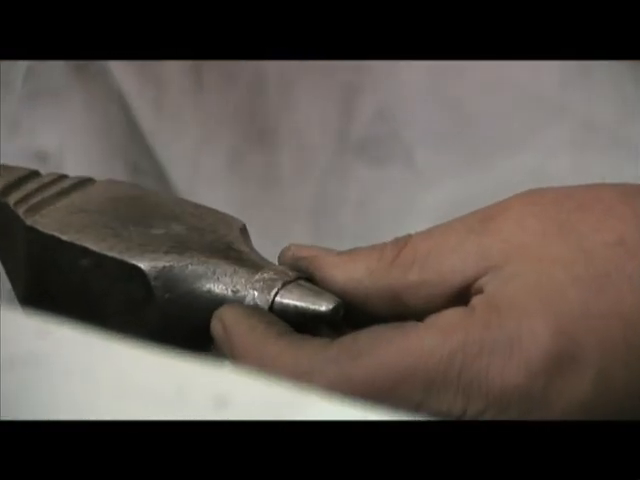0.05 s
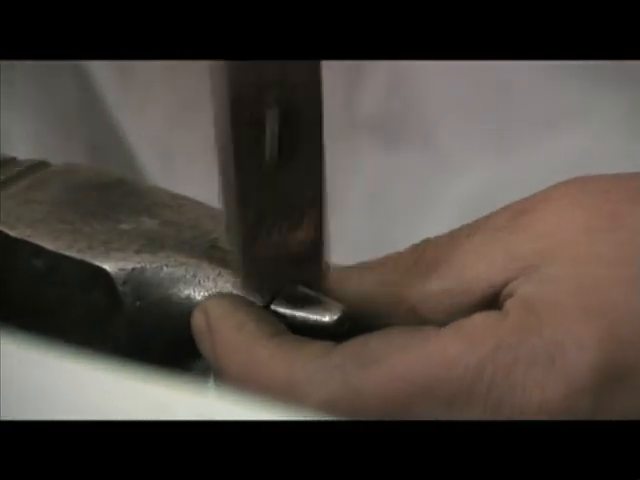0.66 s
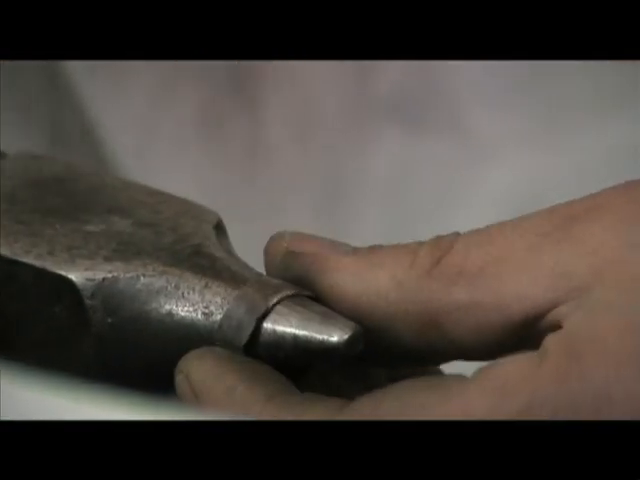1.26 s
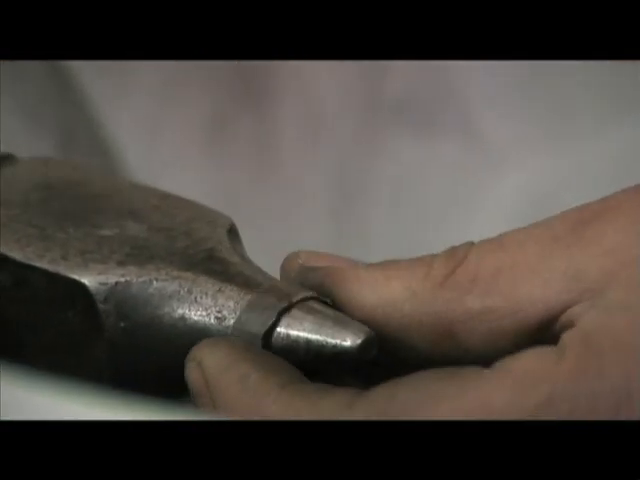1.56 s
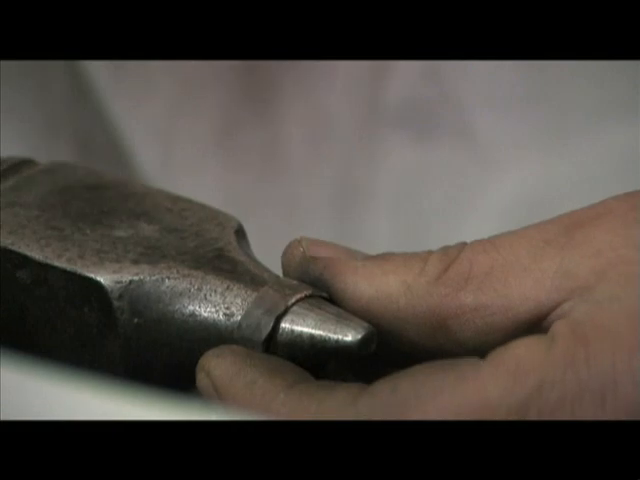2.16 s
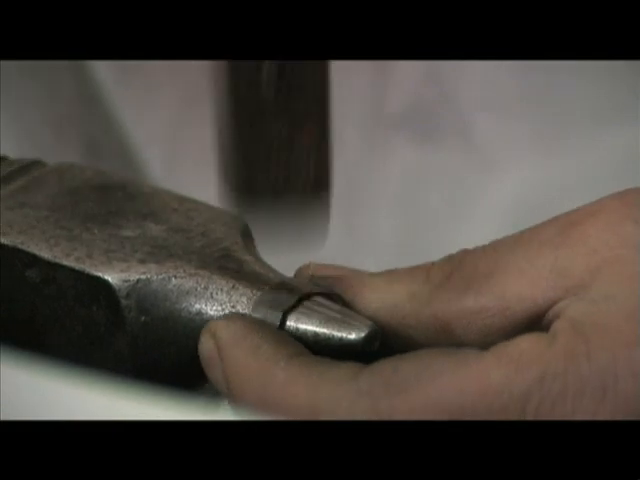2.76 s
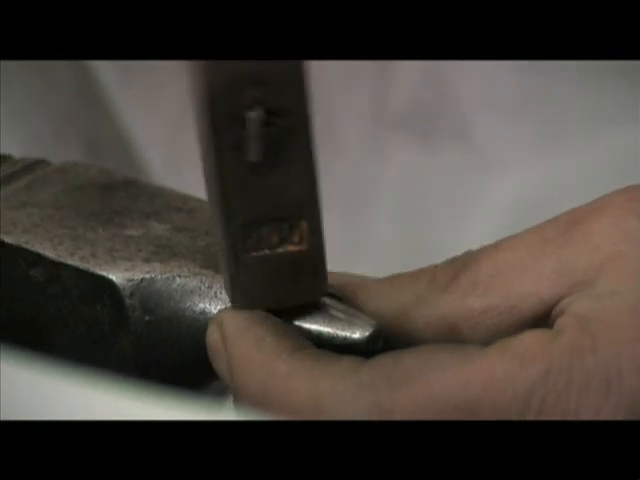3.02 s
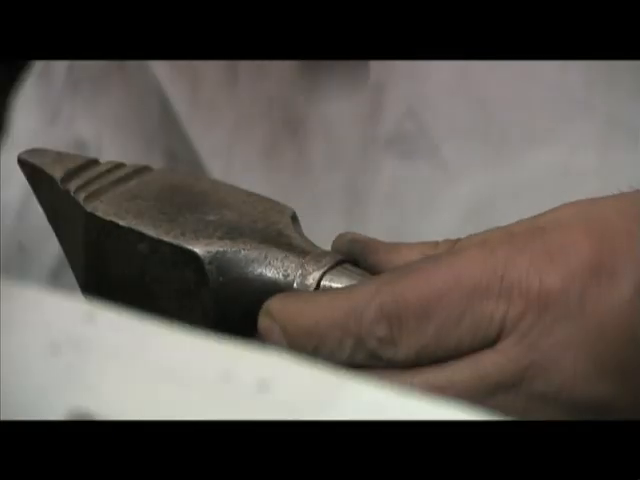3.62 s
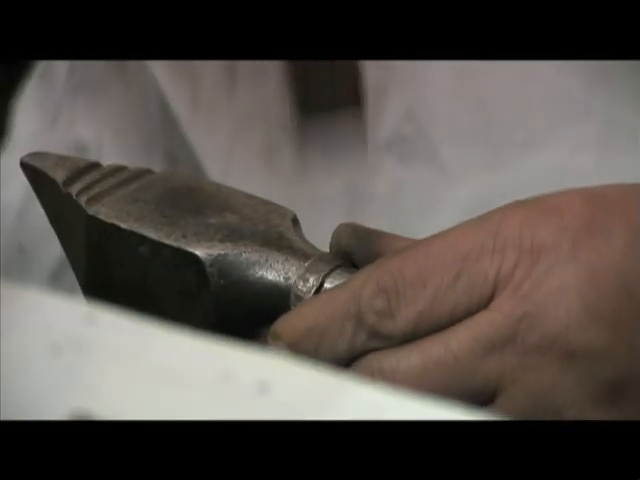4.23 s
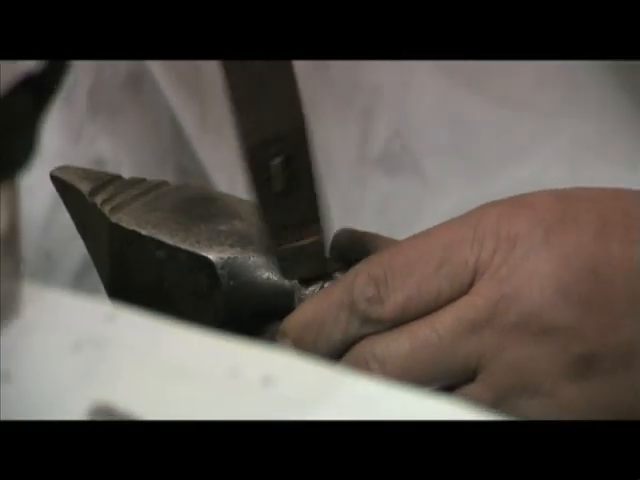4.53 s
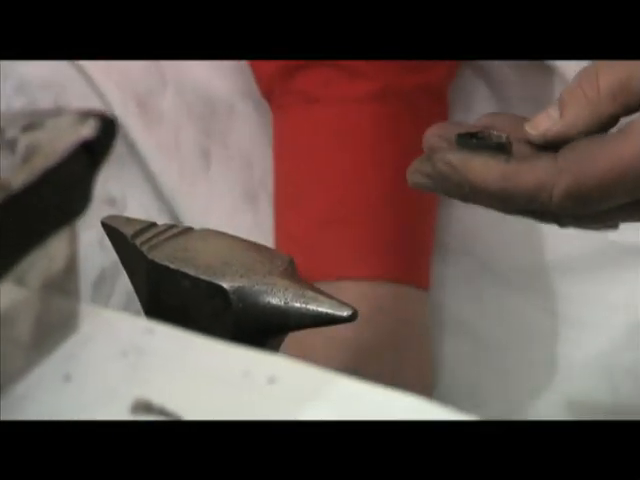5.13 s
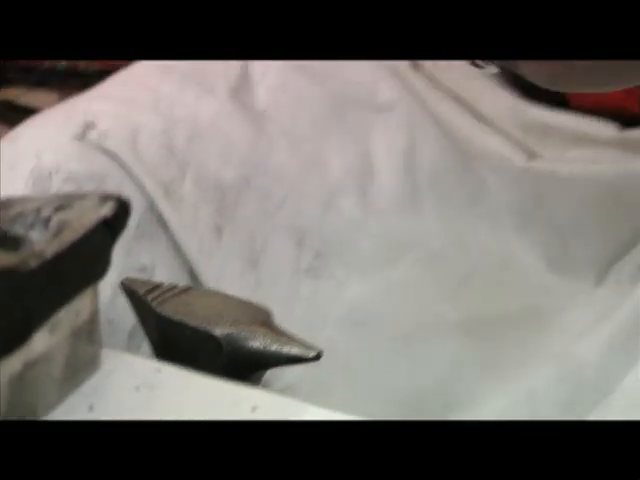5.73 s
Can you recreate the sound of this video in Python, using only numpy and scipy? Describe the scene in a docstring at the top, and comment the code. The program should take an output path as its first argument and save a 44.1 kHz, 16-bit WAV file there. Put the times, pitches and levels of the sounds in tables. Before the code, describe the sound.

Quick, steady hammer strikes clack and ring on a small steel anvil in a workshop, ending with a few faint wooden knocks.

```python
"""A hard-walled workshop, one microphone near the bench anvil. A small hammer taps a metal ring on the
anvil's horn in three runs of quick blows: each is a steel clack, a thud through the bench and a thin
ringing of the anvil, answered by the room. Then a sleeve brushes past and the hammer is laid on the
wooden bench with a few knocks, ticks and a short slide. Quiet air and a faint hum lie behind it all."""
import sys
import numpy as np
from scipy import signal
from scipy.fft import rfft, irfft, next_fast_len
from scipy.io import wavfile
from scipy.ndimage import map_coordinates

SR = 44100
rng = np.random.default_rng(int(sys.argv[2]) if len(sys.argv) > 2 else 0)


def to_wav(sig):
    """Store sig (one row per channel, or 1-D mono) as 16-bit WAV at the path in sys.argv[1].

    Samples outside -1..1 are clipped; the rate is SR.
    """
    pcm = np.clip(np.atleast_2d(sig), -1, 1) * 32767
    pcm = np.round(pcm).astype(np.int16)
    wavfile.write(sys.argv[1], SR, pcm.T)  # frames by channels


N = 259344

# Blows on the horn: t/s, level/dB, seating/dB (how squarely the face drives the ring), steel ping/dB
HAMMER_BLOWS = [(0.2881, -2, -3, -0.5), (0.558, -0.96, -3, 5.5), (0.8114, -1, 0.5, 3),
                (1.0556, 0, -3.5, 2.5), (1.5755, -1.5, -2, -1), (1.849, -1.16, -0.5, 3.5),
                (2.1033, -0.5, 0.5, 1.5), (2.368, -0.7, -1, 3.5), (2.6226, -0.4, 1, -0.5),
                (2.8727, -0.5, 4, -3.5), (3.1204, 0.1, 0.5, 0.5), (3.657, 1.5, 0, -7.5),
                (3.911, 2.05, 0, -1.5), (4.164, 1, -1.5, 3.5), (4.4074, 0.65, -1, 3), (4.6482, 1.5, 0.5, 1)]
# Spectrum of the crack of contact: f/Hz, level/dB
CRACK_SPECTRUM = [(40, -28), (150, 2.5), (400, -6.5), (680, -5.5), (950, -1), (1300, -9), (1950, 2),
                  (2400, -7.5), (3700, -2), (5000, -7), (6500, -2), (8000, -10.5), (10200, -10),
                  (12500, -16.5), (16000, -29)]
# Modes of hammer head and ring, damped by the hand: f/Hz, level/dB, t60/s
STEEL_MODES = [(2737, -42, .03), (3017, -42, .03), (3208, -41, .035), (3499, -42, .03), (3962, -42, .03),
               (4605, -41, .03), (5846, -24.5, .028), (7415, -32.5, .022), (7550, -32.5, .022),
               (8470, -27.5, .025), (9544, -34, .042), (11961, -45, .027), (12362, -47, .027),
               (13320, -36.5, .024), (14793, -47, .027)]
# Modes of the anvil: f/Hz, level/dB, t60/s
ANVIL_MODES = [(1059, -44.5, .38), (1068, -28, .07), (1125, -42.5, .32), (1405, -54, .3), (1545, -50, .28),
               (1574, -50.5, .45), (1580, -40, .06), (1787, -57, .45), (2143, -62, .5), (2182, -42, .06),
               (2853, -51, .36), (3128, -56, .25), (3692, -53, .3), (3846, -50, .33), (3871, -56, .45),
               (5831, -49, .35)]
# Modes of the bench under it: f/Hz, level/dB, t60/s
BENCH_MODES = [(36.4, -59.5, 0.92), (41.54, -57, 0.93), (134, -35.5, 0.024), (165, -40, 0.026),
               (247, -34.5, 0.022), (273.5, -59.5, 0.68), (499, -40, 0.048), (817, -38.5, 0.039),
               (870, -56, 0.56)]
# A square blow rocks the bench more, knocks less hollow and has a keener edge:
# f/Hz, lift/(dB per dB of seating), lift/(dB per dB of ping)
TOUCH_COLOUR = [(71, 1.13, 0), (170, 0.1, 0), (300, 0.18, 0), (500, -0.47, 0), (1000, -0.12, 0),
                (4020, 0, 0), (5860, 0.5, 0.5), (7200, 0, 0), (8600, 0.8, 0.5)]
def hammering(walls):
    """Blows land on nearly the same spot, so their cracks and echoes are much alike."""
    out, t = np.zeros(N), np.arange(len(walls)) / SR
    contact = rng.standard_normal(len(t))
    echo_colour = clang_colour()
    pressure_front = coloured(signal.unit_impulse(len(t)), [(1500, -10), (3500, -12), (8000, -18)])
    recoil_s, recoil_width_s = 0.00356, 0.00083
    u = (t - recoil_s) / recoil_width_s
    recoil = amp(-28.5) * u * np.exp(-u ** 2)  # the anvil sinks into its bench and springs back
    for s, db, seating_db, ping_db in HAMMER_BLOWS:
        rattle = chatter(varied(contact, change=0.02), t, t60=0.082)
        crack = coloured(0.83 * rattle + pressure_front, CRACK_SPECTRUM)
        steel = ringing(STEEL_MODES, t, attack_s=0.0015, scatter_db=2.1, detune_hz=21)
        anvil = ringing(ANVIL_MODES, t, attack_s=0.00073, scatter_db=0.9, detune_hz=1)
        bench = recoil - ringing(BENCH_MODES, t, attack_s=0.00054, scatter_db=3.5, detune_hz=1.5)
        direct = amp(-0.5) * (crack + anvil) + amp(1) * steel + amp(1.5) * bench
        reflections = room_answer(varied(walls, change=0.1), gap_s=0.0077, build_s=0.028)
        echo = amp(-1.03) * coloured(reflections, echo_colour)
        touch = [(hz, seating * seating_db + ping * ping_db) for hz, seating, ping in TOUCH_COLOUR]
        add(out, s, amp(db) * coloured(direct + echo, touch))
    return out


def chatter(noise, t, t60):
    """Metal chatters briefly on metal: a burst even across frequency, of energy 1."""
    spectrum = rfft(noise * fade(t, t60))
    burst = irfft(spectrum / np.abs(spectrum), len(t)) * fade(t, 4 * t60)
    return burst / np.linalg.norm(burst)


# The handle bumps the bench: t/s, level/dB, thump over knock/dB, t60/s of the knock's extra damping
HANDLE_KNOCKS = [(5.1227, -50.5, 11, 0.033), (5.2122, -39, -20, 0.58), (5.2473, -40.5, -5, 1),
                 (5.346, -41, -19, 0.068), (5.3648, -42, -21, 0.044), (5.378, -43, -19, 0.053),
                 (5.478, -58, 7, .03)]
# Modes of the bench top where it lands: f/Hz, level/dB, t60/s
WOOD_MODES = [(336, 7, 0.0095), (524, 4, 0.12), (713, -7, 0.048), (980, -5, 0.019), (1290, -10.5, 0.066),
              (1800, -12, 0.016), (2150, -10, .04)]
# The head touches down: t/s, level/dB, clink over tick/dB
HEAD_TICKS = [(5.1224, -53, -25), (5.1495, -48, -25), (5.265, -45, -34), (5.285, -49, -25), (5.309, -53, 5),
              (5.347, -52.5, 4), (5.378, -63, 6), (5.521, -55, -22)]
# Spectrum of its dry tick: f/Hz, level/dB
TICK_SPECTRUM = [(1000, -7), (3000, -8), (5000, -4), (6600, -8), (8000, -18), (15000, -26)]
# Modes of the clinking head: f/Hz, level/dB, t60/s
CLINK_MODES = [(2140, -25, .05), (3900, 2, 0.029), (4000, -12, .04), (6150, -13, 0.044)]
# Spectrum of the handle sliding on wood: f/Hz, level/dB
SCRAPE_SPECTRUM = [(29, -39.5), (50, -10), (217, -2), (270, -1), (701, -12), (1010, -17.5), (1380, -16),
                   (2030, -25.5), (4000, -28), (6000, -31.5), (12000, -42.5)]
def laying_down():
    """Handle and head bump on the bench top, then slide to rest."""
    out, t = np.zeros(N), np.arange(SR // 4) / SR
    for s, db, thump_db, damping_t60 in HANDLE_KNOCKS:
        thump = ringing([(128, 1.5, 0.037)], t, attack_s=0.00048, scatter_db=1, detune_hz=10)
        knock = ringing(WOOD_MODES, t, attack_s=0.00025, scatter_db=3, detune_hz=10)
        add(out, s, amp(db) * (knock * fade(t, damping_t60) + amp(thump_db) * thump))
    for s, db, clink_db in HEAD_TICKS:
        tick = unit(coloured(rng.standard_normal(len(t)), TICK_SPECTRUM)) * fade(t, t60=0.013)
        clink = ringing(CLINK_MODES, t, attack_s=0.0003, scatter_db=5, detune_hz=8.9)
        add(out, s, amp(db) * (tick + amp(clink_db) * clink))
    scrape = rush(SCRAPE_SPECTRUM, flutter_db=3, flutter_hz=70)
    return out + swell(peak_s=5.372, db=-52, rise_db_per_s=40, fall_db_per_s=63) * scrape


# Spectrum of rubbing cloth: f/Hz, level/dB
CLOTH_SPECTRUM = [(470, -50), (800, -3), (1060, -5), (1100, -7), (1270, -7.5), (2060, -7.5), (3200, 1.5),
                  (5910, -1.5), (15000, -29)]
def sleeve():
    """Cloth brushes softly as the arm reaches across, swelling slowly and stopping."""
    cloth = rush(CLOTH_SPECTRUM, flutter_db=1, flutter_hz=60)
    return swell(peak_s=5.1, db=-59.5, rise_db_per_s=30, fall_db_per_s=159) * cloth


# Spectrum of a blow coming back from the walls: f/Hz, level/dB
ROOM_SPECTRUM = [(35, -9), (110, -7.5), (230, -5), (380, 0), (570, -2), (700, -6), (950, -3.5), (1300, -3),
                 (2300, -3.5), (3400, -6.5), (4800, -10), (6400, -9), (7500, -2.5), (8700, -19.5),
                 (11500, -21), (15000, -26.5)]
# Steel resonances in that echo: f/Hz, width/Hz, lift/dB
CLANG_PEAKS = [(1052, 128, 13), (1569, 165, 10), (2925, 114, 7), (3807, 410, 10.5), (5824, 440, 13.5),
               (8470, 170, 8), (9660, 390, 13.5), (13650, 600, 2)]
def clang_colour():
    """The room's broad colour with the steel resonances standing out, as rows of f/Hz, level/dB."""
    hz = np.geomspace(20, SR / 2, 1500)
    lifts = sum(db / (1 + (2 * (hz - centre) / width) ** 2) for centre, width, db in CLANG_PEAKS)
    return np.transpose([hz, along(ROOM_SPECTRUM, hz) + lifts])


# Reverberation of the workshop: f/Hz, t60/s
ROOM_DECAY = [(60, 0.95), (250, 0.39), (1000, 0.4), (3500, 0.37), (6000, 0.31), (9000, 0.25), (15000, 0.35)]
def room_answer(walls, gap_s, build_s):
    """Reflections reach the microphone after a gap and thicken; each frequency dies at its own speed."""
    hz, frame_s, spectra = signal.stft(walls, SR, nperseg=256)
    decay = fade(frame_s, along(ROOM_DECAY, hz)[:, None])
    tail = signal.istft(spectra * decay, SR, nperseg=256)[1][:len(walls)]
    since_gap = np.maximum(np.arange(len(tail)) / SR - gap_s, 0)
    tail *= 1 - np.exp(-since_gap / build_s)
    return tail / np.linalg.norm(tail)


# Spectrum of the air around the microphone: f/Hz, level/dB
AIR_SPECTRUM = [(25, -8.5), (60, -7), (125, -13.5), (250, -10), (350, -10), (460, -13), (750, -18),
                (1400, -20), (3000, -26.5), (6400, -26.5), (12000, -32.5), (16000, -36.5)]
def room_tone(hum_hz=245.6, settle_s=0.22):
    """Quiet workshop air, a little louder at first, with a faint, wavering hum."""
    t = np.arange(N) / SR
    drift = np.cumsum(rng.standard_normal(N)) / np.sqrt(SR)
    hum = amp(-72.5) * np.sin(2 * np.pi * hum_hz * t + 4 * drift)
    air = rush(AIR_SPECTRUM, flutter_db=0.8, flutter_hz=6)
    return hum + amp(-72 + 3.5 * np.exp(-t / settle_s)) * air


def ringing(modes, t, attack_s, scatter_db, detune_hz):
    """Damped modes, a little different in strength and pitch at every contact."""
    hz, db, t60 = np.transpose(modes)[:, :, None]
    size, shift = rng.standard_normal((2, len(modes), 1))
    envelopes = amp(db + scatter_db * size) * fade(t, t60)
    waves = envelopes * np.sin(2 * np.pi * (hz + detune_hz * shift) * t)
    sign = (-1) ** np.arange(len(modes))  # neighbouring modes swing opposite ways
    return sign @ waves * (1 - np.exp(-t / attack_s))


def rush(spectrum, flutter_db, flutter_hz):
    """Coloured noise of rms 1 whose level flutters at random."""
    flutter = map_coordinates(rng.standard_normal(N), [np.arange(N) * flutter_hz / SR], order=1)
    return unit(coloured(rng.standard_normal(N), spectrum) * amp(flutter_db * flutter))


def swell(peak_s, db, rise_db_per_s, fall_db_per_s):
    """Gain of a stroke that grows to its peak and dies away."""
    t = np.arange(N) / SR - peak_s
    return amp(db + np.minimum(rise_db_per_s * t, -fall_db_per_s * t))


def varied(pattern, change):
    """A noise pattern with a share of its power drawn anew."""
    return np.sqrt(1 - change) * pattern + np.sqrt(change) * rng.standard_normal(len(pattern))


def coloured(x, points):
    """x through a minimum-phase filter shaped by rows of f/Hz, level/dB."""
    m = 2 * next_fast_len(len(x))
    gain = amp(along(points, np.fft.rfftfreq(m, 1 / SR)))
    cepstrum = irfft(np.log(gain), m)
    cepstrum[1:m // 2] *= 2
    cepstrum[m // 2 + 1:] = 0
    return irfft(rfft(x, m) * np.exp(rfft(cepstrum)), m)[:len(x)]


def along(points, hz):
    """Rows of f/Hz, value, read on a log frequency axis."""
    f, values = np.transpose(points)
    return np.interp(np.log(hz + 1), np.log(f), values)


def fade(t, t60):
    """Falls by 60 dB in t60."""
    return np.exp(-np.log(1000) * t / t60)


def amp(db):
    """Decibels to gain."""
    return 10 ** (np.asarray(db) / 20)


def unit(x):
    """Scaled to rms 1."""
    return x / np.sqrt(np.mean(x ** 2) + 1e-20)


def add(track, s, sound):
    """Mix a sound into the track at time s."""
    start = round(s * SR)
    track[start:start + len(sound)] += sound[:N - start]


def scene():
    """At the microphone, in mono: blows and handling echo off the same walls, over the room tone."""
    walls = rng.standard_normal(SR * 3 // 4)  # the pattern of reflections
    handling = laying_down()
    handling_echo = signal.fftconvolve(handling, room_answer(walls, gap_s=0.0037, build_s=0.036))[:N]
    return (hammering(walls) + handling + amp(-13) * handling_echo + sleeve() + room_tone())[None]


def record(dry):
    """The recorder keeps nothing above its band limit."""
    top_hz = 15900
    m = next_fast_len(N + SR // 2)
    passband = np.fft.rfftfreq(m, 1 / SR) < top_hz
    return irfft(rfft(dry, m) * passband, m)[..., :N]


dry = scene()
out = record(dry)
to_wav(out)
```